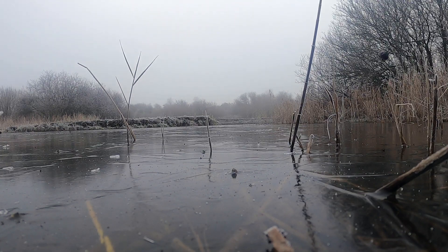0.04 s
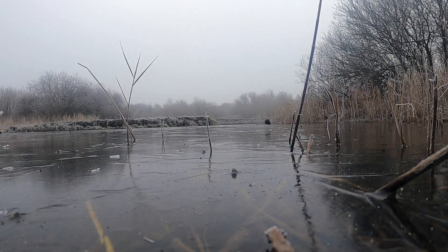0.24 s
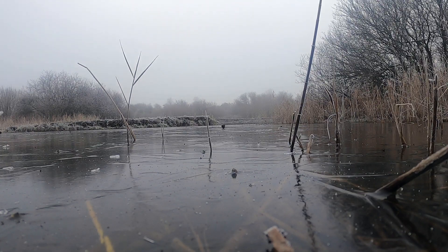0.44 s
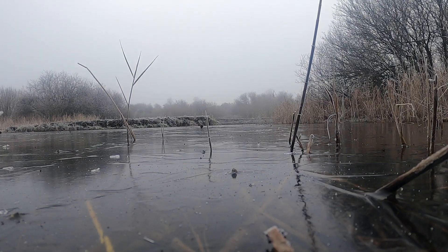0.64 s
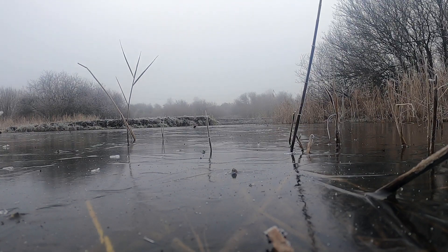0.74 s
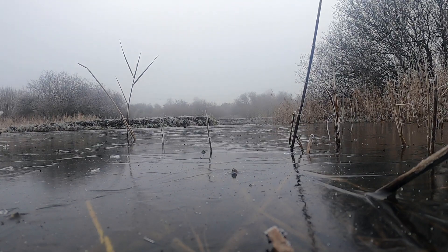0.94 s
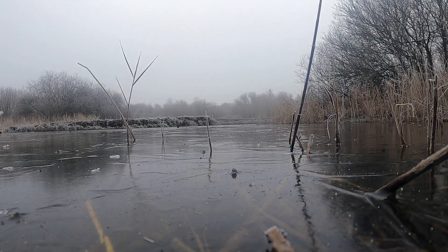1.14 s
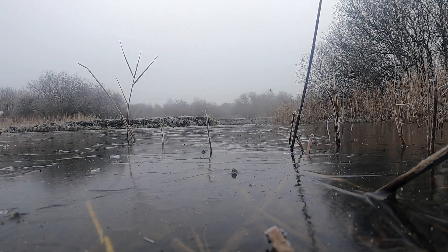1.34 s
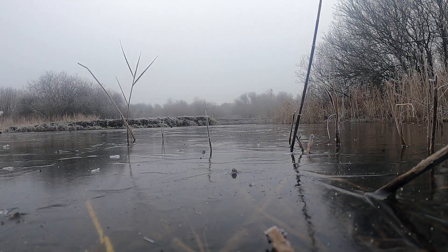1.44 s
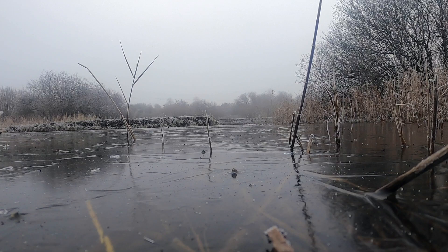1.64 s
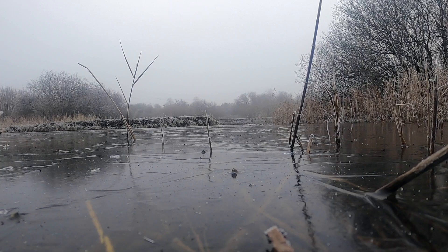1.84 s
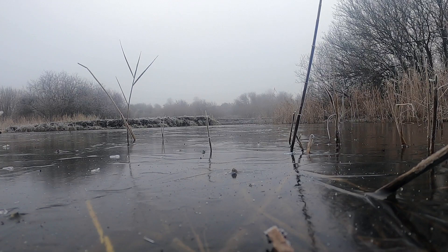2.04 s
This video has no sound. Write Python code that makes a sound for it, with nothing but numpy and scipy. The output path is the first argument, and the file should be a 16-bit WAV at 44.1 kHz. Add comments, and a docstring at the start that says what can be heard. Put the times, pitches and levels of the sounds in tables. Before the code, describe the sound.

A stone skips over a frozen pond, landing at about 0.2 seconds with a tick and a soft frosty crunch. The strongest bounces follow near 0.4 and 0.6 seconds, each a ringing, falling chirp. From 0.7 seconds it tumbles and skids away in many small, gritty pulses, with a stronger hit at 1.6. The chirps lengthen with distance and continue to about 2.1 seconds, over faint outdoor air and low rumble.

```python
"""Falling chirps, ticks and a gritty skid: a stone lands, skips and tumbles away over a frozen pond.
Every contact sends a bending wave through the ice to a microphone close to the surface. High notes
outrun low ones, so each contact arrives as a falling chirp, longer the farther the stone has gone.
The stone rattles more the farther away it gets, and scattered waves linger in the ice over a quiet
outdoor background."""
import sys
import numpy as np
from scipy import signal
from scipy.fft import rfft, irfft, next_fast_len
from scipy.io import wavfile
from scipy.ndimage import map_coordinates

SR = 44100
rng = np.random.default_rng(int(sys.argv[2]) if len(sys.argv) > 2 else 0)


def store_pcm(level_fs):
    """Save levels as 16-bit WAV."""
    pcm = np.round(np.clip(level_fs, -1, 1) * 32767).astype(np.int16)
    wavfile.write(sys.argv[1], SR, np.atleast_2d(pcm).T)


N = 92610

# How far away the stone is. Each row: time in seconds, distance in metres.
STONE_PATH = [(.2, 2.33), (.415, 5.15), (.55, 6.84), (.63, 8), (.83, 9.44), (1.045, 10.3), (1.23, 11.86),
              (1.6, 15.45), (1.73, 17.5), (1.83, 17.85), (2.1, 21.2)]
# How alike left and right sound. Each row: frequency in Hz, likeness (1 means the same).
LIKENESS = [(60, 1), (200, 0.53), (500, 0.82), (1500, 0.59), (4000, 0.6), (9000, 0.17)]


def amp(db):
    """Turn decibels into a gain."""
    return 10 ** (np.asarray(db) / 20)


def unit(x):
    """Scale a signal to an average (rms) level of 1."""
    return x / np.sqrt(np.mean(x ** 2) + 1e-20)


def along(rows, hz):
    """Read a curve at frequency hz, on a log axis."""
    freqs, values = np.transpose(rows)
    return np.interp(np.log(hz + 1), np.log(freqs + 1), values)


def at(rows, s):
    """Read a curve at s seconds."""
    return np.interp(s, *np.transpose(rows))


def filtered(x, response):
    """Change each frequency's level and phase by response(hz)."""
    size = next_fast_len(N + SR // 2)
    return irfft(rfft(x, size) * response(np.fft.rfftfreq(size, 1 / SR)), size)[..., :N]


def add(out, start, x):
    """Mix x into out from sample start on."""
    n = min(x.shape[-1], N - start)
    if n > 0:
        out[..., start:start + n] += x[..., :n]


def mid_and_side(hz):
    """Gains for what left and right share (mid) and where they differ (side)."""
    angle = np.arccos(np.clip(along(LIKENESS, hz), -1, 1)) / 2
    return np.array([np.cos(angle), np.sin(angle)])


def stereo(pair, tone):
    """Blend two unrelated signals into one stereo sound with the given tone, at level 1."""
    mid, side = filtered(pair, lambda hz: amp(along(tone, hz)) * mid_and_side(hz))
    return unit(np.array([mid + side, mid - side]))


def noise(tone):
    """Steady stereo noise with the given tone."""
    return stereo(rng.standard_normal((2, N)), tone)


def grains(per_s, spread_db):
    """Two streams of tiny random impacts."""
    hits = (rng.random((2, N)) < per_s / SR) * rng.choice([-1, 1], (2, N))
    return hits * amp(spread_db * rng.standard_normal((2, N)))


def outdoors(air_db=-58.5, rumble_db=-61.5):
    """Still winter air and a far, low rumble."""
    # The tone of each. Each row: frequency in Hz, relative level in dB.
    air_tone = [(25, 9), (40, -24.5), (74, 4.5), (103, -17), (227, -28.5), (361, -9.5), (1450, -6.5),
                (6430, -40.5), (8360, -93)]
    rumble_tone = [(10, -59), (25, -37), (45, -5.5), (62, -16), (75, 2.5), (88, -7), (130, -4.5), (220, -2),
                   (300, -10), (600, -60.5)]
    # The rumble's swell. Each row: time in seconds, level change in dB.
    swell = [(0, -7), (.55, -2), (1.1, 4.5), (2.1, 3.5)]
    t = np.arange(N) / SR
    return amp(air_db) * noise(air_tone) + amp(rumble_db + at(swell, t)) * noise(rumble_tone)


def through_ice(hz, s, speed_m_per_s=750, dispersion=.6, fastest_khz=4, ring_lag=.274, ring_top_hz=5300):
    """Delay each frequency of a wave sent at time s: the farther the stone, the more slow ones trail."""
    khz = np.maximum(hz, 50) / 1000
    falling = khz ** -dispersion - fastest_khz ** -dispersion
    rising = ring_lag * (khz - fastest_khz) ** 2 * (hz < ring_top_hz)
    delay_s = np.where(khz < fastest_khz, falling, rising) * at(STONE_PATH, s) / speed_m_per_s
    return np.exp(-2j * np.pi * np.cumsum(delay_s) * hz[1])


def distance_db(hz, metres, ripple_hz=220, hollow_hz=650, hollow_width_hz=68):
    """Far contacts sound more uneven, lose bass and gain a hollow resonance of the ice sheet."""
    uneven = .26 * np.tanh(map_coordinates(rng.standard_normal(128), [hz / ripple_hz]))
    bass_loss = .59 * along([(330, 1), (520, 0)], hz)
    hollow = .3675 * np.exp(-((hz - hollow_hz) / hollow_width_hz) ** 2)
    return metres * (uneven - bass_loss + hollow)


def rattle(hz, metres, count=3):
    """The wobbling stone touches again just after a contact, more strongly the farther it has gone."""
    delay_s, gain = rng.uniform(.003, .02, count), rng.standard_normal(count)
    return 1 + amp(-27 + .65 * metres) * gain @ np.exp(-2j * np.pi * np.outer(delay_s, hz))


def ring(hz, t, rise_s=.0005, fade_s=.012):
    """A short ping with a soft start."""
    return np.sin(2 * np.pi * hz * t) * amp(-60 * t / fade_s) * (1 - np.exp(-(t / rise_s) ** 2))


def ice_echoes(early_db=-13, early_fade_s=.05):
    """A fresh stereo tail: quick echoes from nearby cracks, then waves wandering through the sheet."""
    # How long the waves linger. Each row: frequency in Hz, seconds to fade by 60 dB.
    fade_times = [(150, 0.45), (600, 0.43), (1500, 0.28), (3000, 0.04), (4500, 0.91), (7000, 0.08),
                  (12000, .2)]
    # Their tone. Each row: frequency in Hz, relative level in dB.
    tail_tone = [(100, 1), (250, -20), (500, -15.5), (1000, -13.5), (2000, -13), (3000, -10), (4500, -23),
                 (8000, -0.5)]
    hz, t, hiss = signal.stft(rng.standard_normal((2, SR // 3)), SR, nperseg=256)
    hz = hz[:, None]
    fade = amp(-60 * t / along(fade_times, hz))
    late = amp(along(tail_tone, hz)) * fade / np.sqrt(np.mean(fade ** 2, axis=1, keepdims=True))
    early = amp(early_db) * unit(amp(-60 * t / early_fade_s))
    mid, side = signal.istft(hiss * np.hypot(late, early) * mid_and_side(hz), SR, nperseg=256)[1]
    return np.array([mid + side, mid - side]) / np.sqrt(len(mid))


def skips(size=8192, grind_fade_s=.014, ping_hz=4120):
    """Each hit on the ice: a gritty tick, a ping, a falling chirp with a rising ring above it, echoes."""
    # The stone's hits. Each row: start in seconds, then relative level, brightness and high ring in dB.
    contacts = [(0.207, -54.5, 5, 14.5), (0.218, -48.5, 7.5, 14), (0.3198, -36, 2, 3.5),
                (0.4033, -17.5, -12.5, -11.5), (0.4145, -7.5, -10, -29), (0.5486, -21.5, -6.5, 3),
                (0.6219, -15.5, -1, -9.5), (0.6336, -12.5, -5.5, -10), (0.7047, -44.5, 13, 21),
                (0.7135, -42.5, 2, 1), (0.7379, -55.5, 22.5, 10), (0.7592, -32, -6.5, 4.5),
                (0.7848, -32, -14, -2), (0.8125, -33, -5, -7), (0.8319, -22, -17, -11.5),
                (0.9777, -22.5, -4, -2.5), (0.9863, -30.5, -17, 6), (0.9911, -32, -4, 4.5),
                (1.002, -42.5, 11.5, -21), (1.0225, -32.5, -3, 4.5), (1.0442, -21, -18, -6.5),
                (1.079, -40.5, 1, 13), (1.086, -37, 2, 5.5), (1.1001, -46, -1, 21), (1.2286, -25, -12.5, 9),
                (1.253, -28, -15, -11), (1.2807, -46, 4, 18.5), (1.3029, -31, -5.5, -4.5),
                (1.3283, -28.5, -9.5, -1.5), (1.3415, -32.5, -13, -30), (1.3526, -44.5, 8, -13),
                (1.364, -41, 6.5, 14.5), (1.3761, -45.5, 0.5, -17), (1.3861, -30, -12, -45),
                (1.4066, -25.5, -13, -3), (1.4574, -32.5, -5.5, -8), (1.466, -41, 0, 3),
                (1.4766, -40, 3.5, 3.5), (1.5132, -39, 8, 10), (1.5199, -43.5, 15, 15),
                (1.5293, -37, 12, 2), (1.5363, -33, 4.5, -20), (1.5643, -34.5, 3, 2.5),
                (1.5727, -38.5, 8.5, 7), (1.5767, -42, -1.5, 7.5), (1.589, -47, -15, 15),
                (1.5996, -16.5, -7.5, -6), (1.631, -42, 17, -21), (1.6384, -24, -20, -1),
                (1.681, -32, 4, 4.5), (1.6896, -25.5, -10.5, -4.5), (1.7259, -25, 2, 1),
                (1.7567, -29.5, 2.5, 5), (1.7955, -29, 6, -9), (1.7989, -36, 6, 1), (1.8115, -34, -7, -1.5),
                (1.8267, -27, -4, -1), (1.8656, -41.5, 8, 5), (1.872, -38, 5.5, 2.5), (1.9123, -37, 0, 11),
                (1.9319, -34.5, -2, -0.5), (1.9659, -31, -6, -4.5), (2.0102, -34.5, -5, -3),
                (2.0592, -28.5, -6, -27), (2.0733, -29, -9, -33), (2.0859, -15, -20, -56)]
    # The tone of chirp and tick. Each row: frequency in Hz, relative level in dB.
    chirp_tone = [(70, -31.5), (150, -10.5), (220, -6), (310, -10.5), (430, 1.5), (600, -0.5), (950, -1.5),
                  (1300, -3), (2400, -7), (2800, -12), (3100, -6.5), (3500, -14.5), (4250, -3),
                  (4700, -1.5), (5000, -11), (5300, -13), (5800, -27.5), (7000, -35.5), (12000, -74.5)]
    tick_tone = [(3500, -58), (5000, -7), (6000, -2), (7000, -15), (7800, -16.5), (9500, -27.5),
                 (12500, -44), (15000, -56.5)]
    # How gritty a chirp is. Each row: frequency in Hz, share of noise from 0 to 1.
    rough_share = [(700, 0), (1500, .2), (3800, .45), (4500, .85)]
    out, lead = np.zeros((2, N)), size // 32  # lead leaves room just before each hit
    hz, t = np.fft.rfftfreq(size, 1 / SR), np.arange(size) / SR
    ring_band = along([(3900, .017), (4500, .91)], hz)
    bright_band = along([(900, .086), (2300, 1)], hz) * (1 - ring_band)
    rough = along(rough_share, hz)
    for s, db, bright_db, ring_db in contacts:
        metres = at(STONE_PATH, s)
        burst = rng.standard_normal((2, size)) * amp(-60 * t / grind_fade_s)
        grind = rfft(burst / np.linalg.norm(burst, axis=1, keepdims=True))
        tone_db = along(chirp_tone, hz) + bright_db * bright_band + ring_db * ring_band
        impact = amp(tone_db) * (np.sqrt(1 - rough) + np.sqrt(rough) * grind[0])
        chirp = impact * amp(distance_db(hz, metres)) * through_ice(hz, s) * rattle(hz, metres)
        # The tick loses 3 dB per metre, the ping 4.
        tick = grind * amp(along(tick_tone, hz) - 4 + .38 * ring_db - 3 * metres)
        ping = ring(ping_hz * rng.normal(1, .012), t) * amp(18 + ring_db - 4 * metres)
        wave = amp(db) * np.roll(amp(27) * irfft(chirp + tick) + ping, lead, axis=1)
        start = round(s * SR) - lead
        add(out, start, wave)
        add(out, start, signal.fftconvolve(wave, ice_echoes(), axes=1))
    return out


def frost_crunch(start_s=.2127, level_db=-40.5, rise_s=.016, fade_s=.66):
    """The first landing sprays frost over the ice: a quick swell that dies away."""
    # The frost's tone. Each row: frequency in Hz, relative level in dB.
    frost_tone = [(80, -10), (250, -8), (450, 4), (900, 5), (1700, -3.5), (2600, -8), (3500, -7),
                  (4300, -0.5), (5200, -12), (6200, -26), (14000, -58)]
    t = np.maximum(np.arange(N) / SR - start_s, 0)
    return amp(level_db - 60 * t / fade_s) * (1 - np.exp(-t / rise_s)) * noise(frost_tone)


def skid(size=8192, touch_fade_s=.05, spurts_per_s=90):
    """Light touches and sliding: countless tiny contacts smeared by the ice, under a hiss of fine grit."""
    # Touches between hops, which stir the ice's high ring. Each row: start in seconds, level in dB.
    touches = [(0.217, -35.5), (0.231, -39.5), (0.319, -45), (0.382, -48.5), (0.5, -48.5), (.68, -53.5),
               (.695, -41.5), (0.71, -54), (0.74, -46), (.764, -43), (0.788, -59), (0.822, -40.5),
               (0.846, -44), (0.868, -55), (0.898, -42.5), (.918, -45.5), (.934, -52), (0.945, -45),
               (1.036, -40), (1.284, -38)]
    # How loud the sliding and the grit are. Each row: time in seconds, level in dB.
    slide_level = [(.66, -94), (.7, -52.5), (.78, -64), (.84, -51), (.96, -61), (1.07, -72), (1.115, -44.5),
                   (1.21, -48), (1.26, -60), (1.37, -44.5), (1.43, -67), (1.475, -42), (1.53, -44),
                   (1.555, -58.5), (1.59, -40.5), (1.66, -78.5), (1.82, -60.5), (1.9, -61), (2.02, -47),
                   (2.09, -49.5)]
    grit_level = [(.205, -77), (.235, -66.5), (.27, -100), (.675, -105), (.7, -70), (.79, -82), (.815, -80),
                  (.88, -87), (.925, -70), (.965, -87), (1.06, -92), (1.12, -78.5), (1.27, -81),
                  (1.35, -82.5), (2.0, -102)]
    # The tone of all three. Each row: frequency in Hz, relative level in dB.
    touch_tone = [(500, -13.5), (3600, -9), (4300, 5), (4750, -3), (5400, -21.5), (12000, -45.5)]
    slide_tone = [(60, -25.5), (200, -2.5), (310, -6), (550, -0.5), (1000, -0.5), (1600, -3.5), (2600, -6),
                  (3500, -9.5), (4600, 4), (5200, -4.5), (5900, -9.5), (7000, -24), (8000, -32),
                  (10000, -45), (14000, -88.5)]
    grit_tone = [(3500, -13.5), (6000, -7), (8000, 4), (10500, -13), (12500, -24), (14000, -43.5)]
    t = np.arange(N) / SR
    chatter = sum(amp(db - 60 * np.abs(t - s) / touch_fade_s) * np.clip((t - s) / .001, 0, 1)
                  for s, db in touches)
    sliding = amp(at(slide_level, t)) * (t > slide_level[0][0])
    force = sliding * stereo(grains(per_s=2500, spread_db=4.5), slide_tone) + chatter * noise(touch_tone)
    spurts_db = 4 * map_coordinates(rng.standard_normal(N), [t * spurts_per_s], order=1)
    grit_gain = amp(at(grit_level, t) + spurts_db) * (t > grit_level[0][0])
    out = grit_gain * stereo(grains(per_s=1400, spread_db=5), grit_tone)
    # Send each short slice through the ice from where the stone is at that moment.
    hz, step = np.fft.rfftfreq(size, 1 / SR), size // 4
    force, window = np.pad(force, ((0, 0), (0, 2 * step))), signal.get_window("hann", 2 * step)
    for i in range(0, N, step):
        piece = rfft(force[:, i:i + 2 * step] * window, size)
        add(out, i, irfft(piece * through_ice(hz, (i + step) / SR)))
    return out


def clinks():
    """The stone itself rings briefly when it lands on an edge."""
    # Each row: start in seconds, pitch in Hz, level in dB.
    edge_landings = [(.2178, 7960, -61), (0.402, 3150, -28.5), (0.62, 7780, -40.5)]
    t = np.arange(N) / SR
    return sum(amp(db) * ring(hz, np.maximum(t - s, 0)) for s, hz, db in edge_landings)


def scene():
    """The stone and ice, mostly earlier and fuller on the right, over the outdoor background."""
    # Left-right balance. Each row: frequency in Hz, left minus right in dB.
    balance = [(60, -2), (170, -4), (300, -10.5), (500, -4.5), (770, -9), (1290, -2), (2150, 0.5),
               (3600, 3), (6000, 0.5)]
    # How far the left side is ahead. Each row: frequency in Hz, phase in radians.
    left_lead = [(30, 0.41), (260, -0.71), (900, -0.39), (1800, -0.72), (3500, -0.67), (5500, -1.27)]
    side = np.array([[.5], [-.5]])
    placement = lambda hz: amp(side * along(balance, hz)) * np.exp(1j * side * along(left_lead, hz))
    return filtered(skips() + clinks() + skid() + frost_crunch(), placement) + outdoors()


def record(dry, low_cut_hz=38, top_hz=14000):
    """Drop the deepest bass and the highest treble."""
    return filtered(dry, lambda hz: (hz < top_hz) * (1 - 1 / (1 + (hz / low_cut_hz) ** 6)))


dry = scene()
out = record(dry)
store_pcm(out)
```